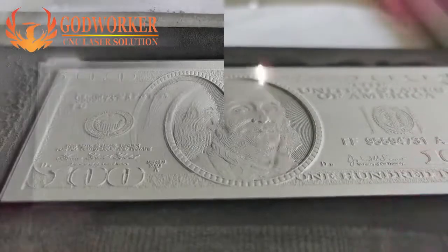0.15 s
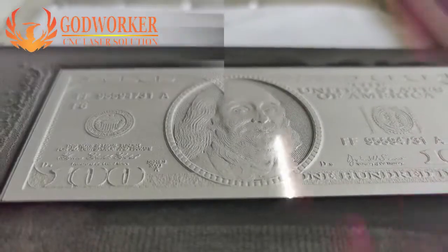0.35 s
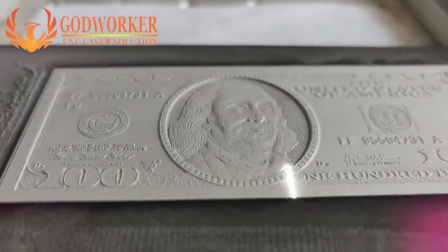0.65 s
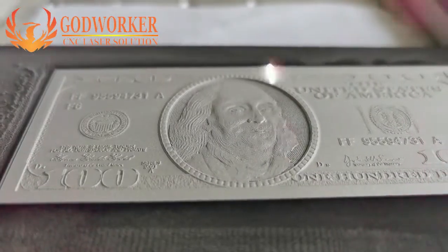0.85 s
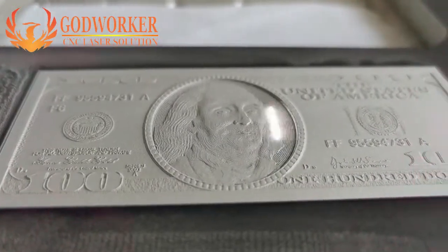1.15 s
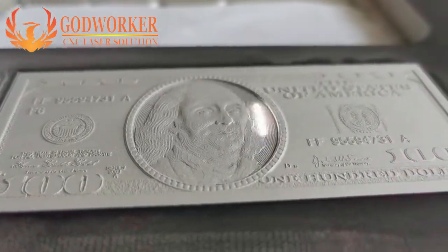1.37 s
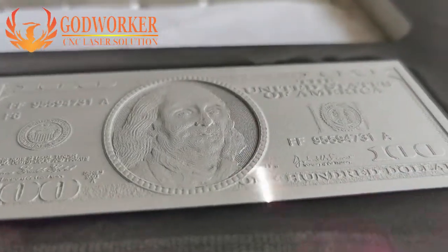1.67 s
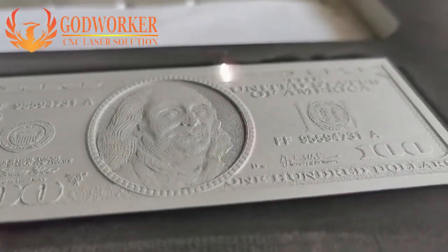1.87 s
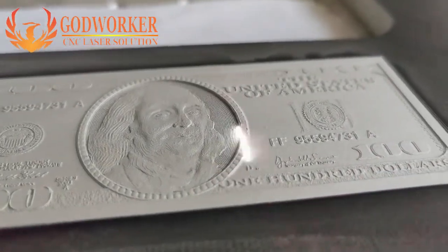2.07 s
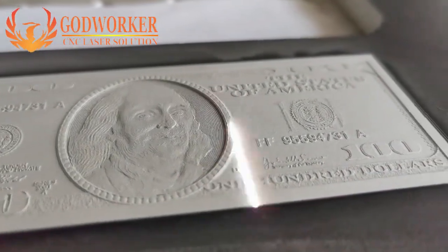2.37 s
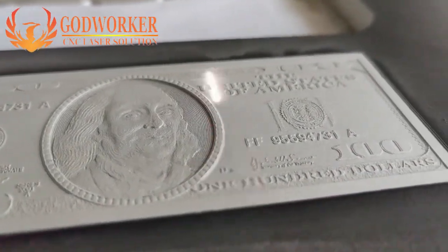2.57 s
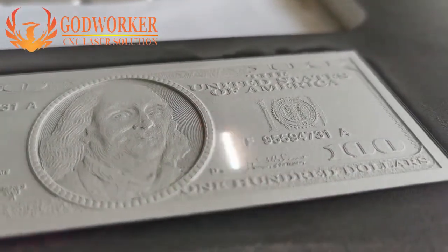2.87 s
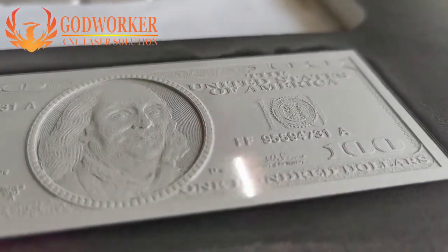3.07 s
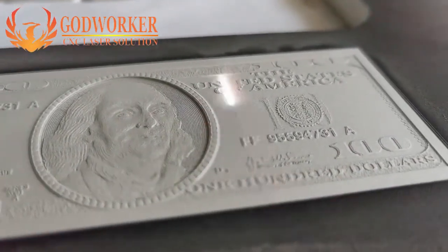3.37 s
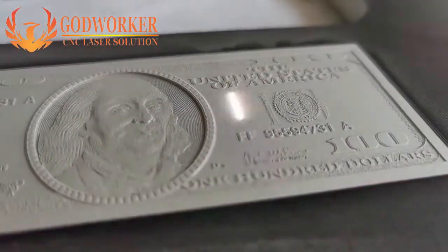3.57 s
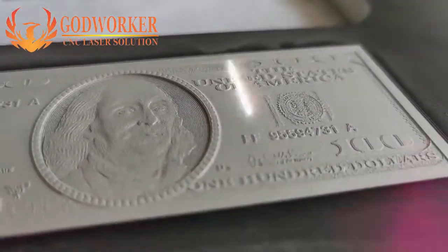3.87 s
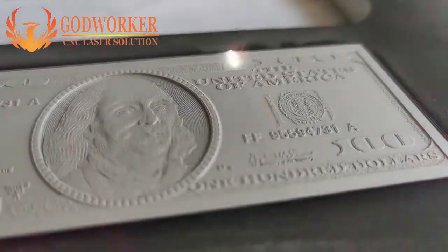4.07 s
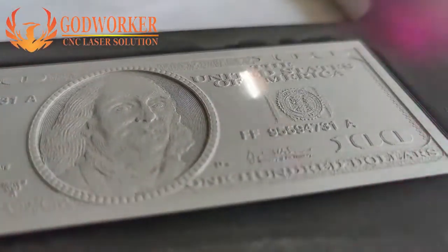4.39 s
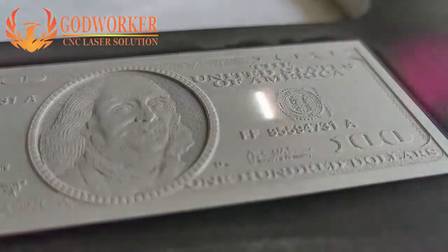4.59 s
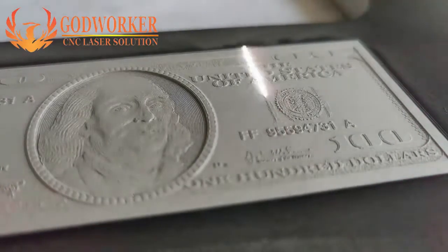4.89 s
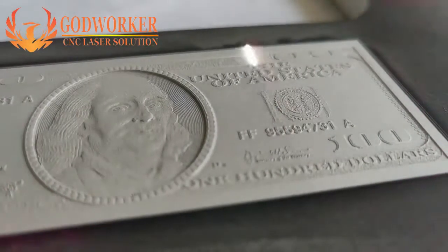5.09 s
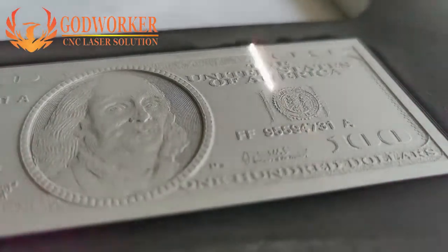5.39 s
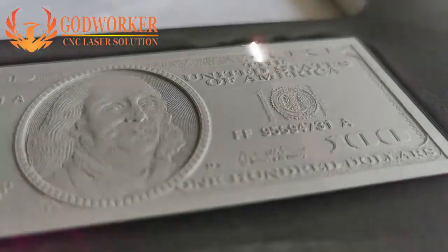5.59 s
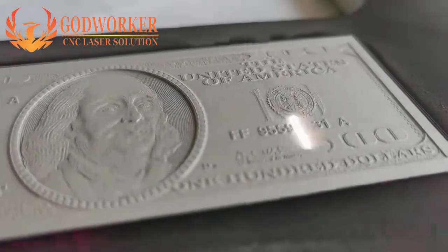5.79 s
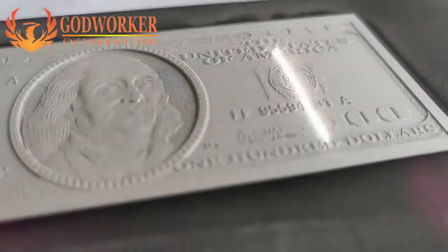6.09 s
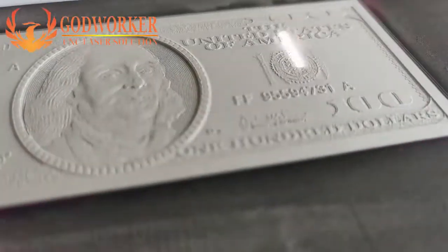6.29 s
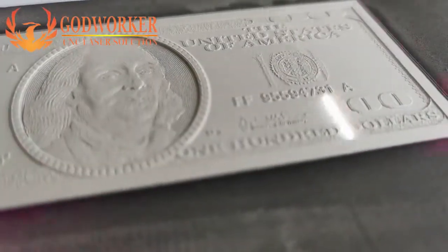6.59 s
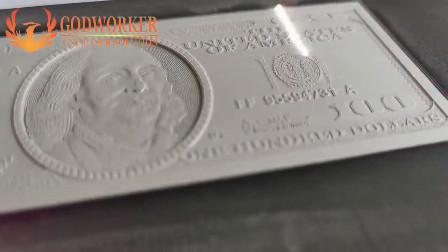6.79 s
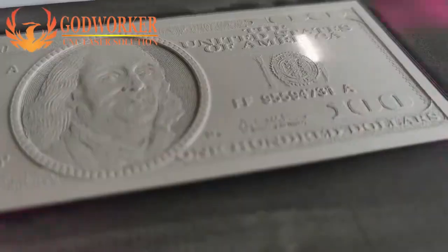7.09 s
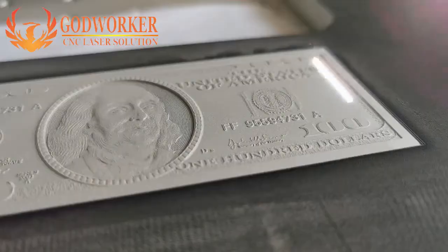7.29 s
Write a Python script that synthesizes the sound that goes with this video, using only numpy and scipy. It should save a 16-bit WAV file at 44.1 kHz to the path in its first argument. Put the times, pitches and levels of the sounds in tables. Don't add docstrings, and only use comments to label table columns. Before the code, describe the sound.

A constant, pitched rush of suction air runs throughout, layered with steady high motor whines and a faint low machine rumble. It begins somewhat distant and duller, then moves close as the handheld microphone nears the nozzle. Small dull finger thuds occur irregularly. The treble swells on the right, flickers as the hand tilts, catches short soft gusts, and turns sharply brighter just before the end.

```python
import sys
import numpy as np
from scipy import signal
from scipy.fft import rfft, irfft, next_fast_len
from scipy.io import wavfile
from scipy.ndimage import uniform_filter1d

SR = 44100
rng = np.random.default_rng(int(sys.argv[2]) if len(sys.argv) > 2 else 0)


def to_wav(s):
    ch = np.atleast_2d(s).T
    pcm = np.round(np.clip(ch, -1, 1) * 32767)
    wavfile.write(sys.argv[1], SR, pcm.astype(np.int16))


def volts_from_decibels(level):
    exponent = np.asarray(level, float) / 20
    return 10 ** exponent


N = 328545
SIZE = next_fast_len(N)
HZ = np.arange(SIZE // 2 + 1) * SR / SIZE + 1e-3
TIME = np.arange(N) / SR


def curves(table):
    s, *columns = np.transpose(table)
    return np.array([np.interp(TIME, s, column) for column in columns])


def colour(hz, db):
    return volts_from_decibels(np.interp(np.log(HZ), np.log(hz), db))


def noise():
    return rfft(rng.standard_normal(SIZE)) * np.sqrt(SR / 2)


def walk(rate):
    hold = int(SR / rate)
    steps = np.repeat(rng.standard_normal(N // hold + 1), hold)
    smooth = uniform_filter1d(uniform_filter1d(steps, hold), hold)
    return 1.3 * smooth[:N]


# (time [s], level below the closest place [dB])
DRIFT = [(0, -14), (.2, -15), (.8, -15), (1.2, -13.5), (1.399, -11), (1.6, -9.5), (2.0, -5), (2.4, -2.5),
         (2.6, -1), (2.8, -1.5), (3.2, -2), (3.5, -0.7), (4.0, -.5), (4.2, 0.9), (4.4, -0.5), (5.4, -0.5),
         (6.6, 0), (7.45, -0.4)]
# (time [s], tilt [dB])
TILT = [(0, 4), (.8, 1), (1.0, 1), (1.2, -4), (1.4, -0.5), (2.2, 0), (2.6, 1.5), (3.2, 0.5), (3.4, 5.5),
        (3.6, -4), (3.8, 0), (4.0, 6.5), (4.6, -0.5), (5.2, -3), (6.0, -3.5), (6.4, -3), (6.8, -4),
        (7.26, -2.5)]


def motion(bands):
    near_db, drift, tilt, swing_db = np.transpose(bands)[:, :, None]
    swing_s, rise_s, ease_per_s = 7.26, 0.054, 1.6
    since = TIME - swing_s
    swing = np.clip(since / rise_s, 0, 1) * np.exp(-ease_per_s * np.maximum(since - rise_s, 0))
    return near_db + drift * curves(DRIFT) + tilt * curves(TILT) + swing_db * swing


# (level when closest [dB], share of drift [ratio], share of tilt [ratio], last swing [dB])
HOSE_MOTION = [(0, 0.25, 0.0048, 1.5), (0, 0.5, 0.0085, 1.1)]


def hose_motion():
    return motion(HOSE_MOTION)


# (level when closest [dB], share of drift [ratio], share of tilt [ratio], last swing [dB])
BEAM_MOTION = [(-1.6, 0.28, -0.09, -2), (0.22, 1.185, -0.05, .2), (-0.71, 1.1, -0.63, 6.5),
               (0, 1.1, 0.82, 13), (0, .9, .8, 2.5)]


def beam_motion():
    return motion(BEAM_MOTION)


# (frequency [Hz], lead of the left port [radians])
PORT_LEAD = [(0, 0.5), (1210, -0.5), (1460, 1.09), (1810, 0.42), (2840, 2.5), (3530, 2.14), (4310, 2.5),
             (5170, 3.5), (7750, 6), (8530, 8.5), (9560, 7.5), (10900, 9), (12700, 12), (16600, 12.7)]


def port_lead(hz):
    return np.interp(hz, *np.transpose(PORT_LEAD))


# (frequency [Hz], left level [dB], right level [dB])
CASE_SHADE = [(500, 0.5, 0.5), (1300, -0.5, -1), (4080, -3, -1.5), (4600, -3, -2), (5330, 0.5, 1),
              (6300, -2, 3), (7600, 0, 0.5), (8350, -4, 3), (9500, 2, -2.5), (9800, -2, -2),
              (10640, -0.5, 3), (12200, 4, -13.5), (13200, -1.5, -8), (15000, -2, -2)]


def ports(direct, apart):
    turn_s, lag_s = (1.97, 2.8), 2.1e-5
    lead = port_lead(HZ)
    late = direct * np.exp(1j * np.array([lead, 0 * lead])) + apart
    hz, left_db, right_db = np.transpose(CASE_SHADE)
    left_shade = colour(hz, left_db) * np.exp(2j * np.pi * HZ * lag_s)
    early = late * np.array([left_shade, colour(hz, right_db)])
    turned = np.interp(TIME, turn_s, (0, 1))
    return irfft(early, SIZE)[:, :N] * (1 - turned) + irfft(late, SIZE)[:, :N] * turned


# (frequency [Hz], density [dB per Hz])
SHOP_RUMBLE = [(12, -38), (20, -6), (54, -8), (157, 0), (211, -0.5), (300, -3), (390, -13), (660, -120)]


def shop():
    gain = colour(*np.transpose(SHOP_RUMBLE))
    mid = irfft(gain * noise(), SIZE)[:N]
    side = irfft(gain * noise(), SIZE)[:N] * volts_from_decibels(-4.5)
    level_db = -61.5 + 0.4 * hose_motion()[0] + 1.5 * walk(3.36)
    return np.array([mid + side, mid - side]) / mid.std() * volts_from_decibels(level_db)


# (time [s], peak level [dB], left minus right [dB], pitch [Hz])
FINGER_BUMPS = [(0.329, -48, -6, 280), (0.587, -49, -18, 215), (0.659, -50, -14, 129),
                (0.826, -47, -17, 201), (0.928, -53, -5, 267), (0.951, -52, -17, 130),
                (1.111, -54, -6, 159), (1.339, -58, -3.5, 205), (1.425, -54, -18, 165),
                (1.689, -42, -9, 208), (2.186, -53, 0.0, 134), (2.589, -48, 1.5, 155),
                (3.787, -46, 0.0, 300), (4.335, -43, 3, 299), (5.449, -57, 3.5, 284), (6.003, -41, -1, 293)]


def bumps():
    rise_s, fall_s, gain_db, spread = 0.0047, 0.012, -3.5, 1.6
    out = np.zeros((2, N))
    t = np.arange(int(.1 * SR)) / SR
    shape = (1 - np.exp(-t / rise_s)) * np.exp(-t / fall_s)
    shape = shape / shape.max()
    for s, db, pan_db, hz in FINGER_BUMPS:
        detune, turn = rng.random((2, 4, 1))
        wobble_hz = hz * spread ** (2 * detune - .7)
        wobbles = np.sin(2 * np.pi * (wobble_hz * t + turn)).sum(axis=0)
        thud = shape * wobbles / 2
        port_db = db + gain_db + np.array([[pan_db], [-pan_db]]) / 2
        out[:, int(s * SR):][:, :len(t)] += thud * volts_from_decibels(port_db)
    return out


BEAM_EDGES = (5080, 10350, 12800, 14300)


def motor(shaft, orders, wander_hz, waver_db):
    turns = np.cumsum(curves(shaft)[0] + wander_hz * walk(6)) / SR
    hose_db = hose_motion()
    beam_db = beam_motion()[:2] + 12 * np.exp(-TIME / 0.26)
    out = 0
    for order, left_db, right_db in orders:
        tone_hz = order * shaft[-1][1]
        near_db = hose_db if tone_hz < BEAM_EDGES[0] else beam_db
        phase = 2 * np.pi * (order * turns + rng.random()) + np.array([[port_lead(tone_hz)], [0]])
        level_db = np.array([[left_db], [right_db]]) + near_db + waver_db * walk(5.5)
        out = out + np.sqrt(2) * np.sin(phase) * volts_from_decibels(level_db)
    return out


# (time [s], shaft rate [Hz])
FAN_SPEED = [(0, 254.2), (2, 254.1), (2.8, 254.6), (6.8, 254.8), (7.45, 255.4)]
# (multiple of shaft rate [ratio], left level [dB], right level [dB])
FAN_TONES = [
    (1, -73, -72),
    (3, -68, -69),
    (7, -60, -52),
    (10.91, -62, -56),
]


def cooling_fan():
    return motor(FAN_SPEED, FAN_TONES, wander_hz=0.497, waver_db=3.3)


# (time [s], shaft rate [Hz])
TURBINE_SPEED = [(0, 397.8), (.35, 398.9), (2.4, 398.8), (4.2, 399.1), (5.2, 399.2), (5.6, 398.8),
                 (6, 399.1), (6.5, 398.6), (7.45, 398.9)]
# (multiple of shaft rate [ratio], left level [dB], right level [dB])
TURBINE_TONES = [(1, -54, -65), (2, -62, -62), (3, -69, -69), (9, -57, -61), (10, -54, -52), (12, -57, -55),
                 (24, -56, -44), (28, -62, -62)]


def turbine():
    return motor(TURBINE_SPEED, TURBINE_TONES, wander_hz=0.154, waver_db=2.4)


# (frequency [Hz], half width [Hz], left density [dB per Hz], right density [dB per Hz])
HOSE = [(507.4, 13, -61.5, -67), (994, 16.4, -63.5, -67.5), (1488, 27, -63, -63), (1957, 21.5, -70, -73),
        (2473, 25, -64, -62.5), (2960, 112, -61, -61.5), (3098, 79, -62, -65.5), (3504, 126, -64.5, -67),
        (3962, 113, -63.5, -61), (4730, 93, -70, -81), (4870, 230, -69.5, -66.0)]
# (frequency [Hz], half width [Hz], left density [dB per Hz], right density [dB per Hz])
NOZZLE = [(5793, 344, -70.5, -64), (6500, 82, -72, -65), (6970, 108, -73, -59.5), (7680, 180, -70.5, -56),
          (7910, 106, -66.5, -54), (9190, 140, -76, -64), (9550, 190, -81, -67.5), (10090, 160, -81, -65.0),
          (10870, 180, -71, -57.0), (11960, 360, -73, -58.0), (12800, 66, -82.0, -59.5),
          (13482, 138, -76.5, -68), (14200, 273, -71.5, -69), (14850, 360, -69.0, -70)]
# (frequency [Hz], half width [Hz], left density [dB per Hz], right density [dB per Hz])
JOINTS = [(4530, 94, -66.5, -65), (1783, 40, -74, -69.5), (1986, 11, -66, -69), (2370, 20, -84, -73),
          (527, 5.1, -63.5, -70.5), (14020, 30, -70, -68), (14784, 25, -72, -68)]
# (frequency [Hz], left density [dB per Hz], right density [dB per Hz])
BENCH_HISS = [(300, -88, -79), (420, -91, -97), (664, -81.5, -80), (1280, -81, -81), (2180, -77.5, -75.5),
              (3640, -70, -71), (4240, -85, -76), (5500, -77.5, -70.5), (6000, -89, -85),
              (7100, -77.4, -71.5), (8500, -100.0, -71.5), (10500, -79.5, -74), (13100, -83.5, -72),
              (15700, -70.5, -78.5)]
# (time [s], length [s], level [dB])
JET_PUFFS = [
    (2.585, .02, 0.5),
    (2.631, 0.011, 5.5),
    (2.665, 0.014, 1.5),
    (3.882, 0.017, 2.5),
    (5.42, .02, 0.5),
]


def airflow():
    alike, gust_db, flicker_db, wide_hz, nozzle_hz = 0.86, .5, 0.44, 700, 2700
    power = 0
    for hz, width, left_db, right_db in HOSE + NOZZLE + JOINTS:
        slope = 2 if hz > nozzle_hz else 1
        power = power + volts_from_decibels([[left_db], [right_db]]) ** 2 / (1 + ((HZ - hz) / width) ** 2) ** slope
    power = power / (1 + (260 / HZ) ** 6)
    hz, left_db, right_db = np.transpose(BENCH_HISS)
    scatter = np.array([colour(hz, left_db), colour(hz, right_db)]) * (HZ > hz[0])
    scatter[0] = np.hypot(scatter[0], volts_from_decibels(-79) * (HZ > nozzle_hz))
    shared = 1 / (1 + (HZ / wide_hz) ** 2)
    direct = np.sqrt(alike * power) * noise() + np.sqrt(shared) * scatter * noise()
    apart_power = (1 - alike) * power + (1 - shared) * scatter ** 2
    apart = np.sqrt(apart_power) * np.array([noise(), noise()])

    left_db, *right_bands_db = beam_motion()
    puff_db = sum(db * np.exp(-((TIME - s) / length) ** 2) for s, length, db in JET_PUFFS)
    gains_db = [hose_motion() + 0.87 * puff_db]
    for right_db in right_bands_db:
        gains_db.append(np.array([left_db + .3 * puff_db, right_db + puff_db]))
    above = [1] + [1 / (1 + (edge / HZ) ** 40) for edge in BEAM_EDGES] + [0]
    out, gust = 0, gust_db * walk(30)
    for k, db in enumerate(gains_db):
        band = above[k] - above[k + 1]
        sound = ports(band * direct, band * apart)
        out = out + sound * volts_from_decibels(db + gust + flicker_db * walk(16))
    return out


def scene():
    return shop() + bumps() + cooling_fan() + turbine() + airflow()


BLOCK, BLOCK_START = 1024, 389
STAGES = (-15.3, -12.5, -4, -2)


def lost_bands(x, table, hold):
    spectrum, lost = rfft(x, SIZE), 0
    block = (np.arange(N) + BLOCK - BLOCK_START) // BLOCK
    drift_db = np.interp(np.arange(len(hold)) * BLOCK / SR, *np.transpose(DRIFT))
    for low_hz, high_hz, far, way, near in table:
        runs = hold + uniform_filter1d(rng.standard_normal(len(hold)), size=2)
        rank = runs.argsort().argsort() / len(runs)
        gone = rank < np.interp(drift_db, STAGES, (far, way, way, near))
        gone = uniform_filter1d(1. * gone[block], size=BLOCK // 2)
        band = (HZ >= low_hz) * (HZ < high_hz)
        lost = lost + gone * irfft(spectrum * band, SIZE)[:N]
    return lost


# (time [s], length [s], strength [ratio])
DROPOUT_SPELLS = [(0, .25, -8), (.41, .05, 3), (.55, .02, 2), (.32, .03, 2), (.66, .07, 3), (.82, .03, 3),
                  (.97, .04, 3), (1.28, .2, 2), (1.95, .25, .6), (2.47, .06, 2), (2.61, .04, -4),
                  (2.95, .28, 3.5), (4, .05, 3), (4.37, .06, 3), (5.35, .05, 3), (5.85, .05, 2),
                  (6.1, .08, 1.5), (6.35, .05, 2), (6.52, .06, 3), (6.7, .04, 2), (6.92, .06, 2),
                  (7.2, .12, 2)]
# (low edge [Hz], high edge [Hz], share lost when far, on the way, near [ratio])
LOST_SUM = [(8960, 9650, .85, .03, 0), (9650, 10330, .4, 0, 0), (3790, 4130, .1, .4, 0),
            (4130, 4250, .7, .93, .03), (4250, 4480, .7, .93, .55), (4480, 4650, .6, .8, .72),
            (4650, 4820, 0, 0, .7), (4820, 4990, 0, 0, .6), (4990, 5160, 0, 0, .38),
            (5160, 5400, 0, 0, .18), (12400, 12650, 0, .3, 0), (12650, 13100, 0, .2, 0),
            (850, 910, .3, .3, .25), (2600, 2740, .35, .35, .25)]
# (low edge [Hz], high edge [Hz], share lost when far, on the way, near [ratio])
LOST_SIDE = [(0, 110, 0, 0, .4), (110, 190, 0, 0, .27), (190, 320, 0, .03, .15)]
# (low edge [Hz], high edge [Hz], share lost when far, on the way, near [ratio])
LOST_LEFT = [(8270, 8960, .45, .1, .85), (6200, 6330, .05, .15, .35), (10330, 10500, .15, .2, .4),
             (9750, 9900, .05, .1, .25), (12450, 12600, 0, .1, .3), (7230, 7330, 0, .05, .25)]
# (low edge [Hz], high edge [Hz], share lost when far, on the way, near [ratio])
LOST_RIGHT = [(8270, 8960, .45, 0, 0), (12400, 12750, .25, .05, 0), (13400, 13700, .2, 0, 0),
              (14100, 14400, 0, .2, 0), (15150, 15400, 0, .45, 0), (15400, 15750, .35, .45, 0),
              (6200, 6330, .1, .15, .3), (10330, 10500, .1, .1, .28)]


def dropouts(x):
    blocks_s = np.arange(N // BLOCK + 2) * BLOCK / SR
    hold = .5 * rng.standard_normal(len(blocks_s))
    for s, length, strength in DROPOUT_SPELLS:
        hold = hold - strength * np.exp(-((blocks_s - s) / length) ** 2)
    x = x - lost_bands(x.mean(axis=0), LOST_SUM, hold)
    x = x - lost_bands((x[0] - x[1]) / 2, LOST_SIDE, hold) * np.array([[1], [-1]])
    left = lost_bands(x[0], LOST_LEFT, hold)
    right = lost_bands(x[1], LOST_RIGHT, hold)
    return x - np.array([left, right])


def band_limit(x):
    return signal.sosfilt(signal.butter(12, 15750, fs=SR, output="sos"), x)


def record(dry):
    mix = dropouts(dry)
    return band_limit(mix)


dry = scene()
out = record(dry)
to_wav(out)
```